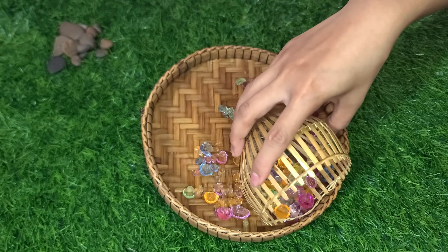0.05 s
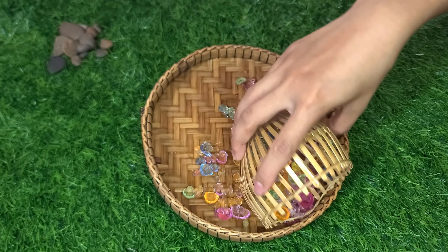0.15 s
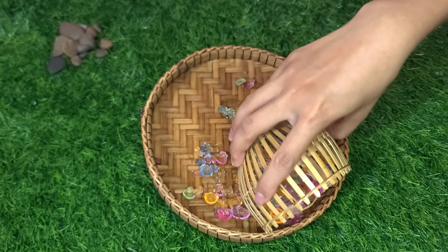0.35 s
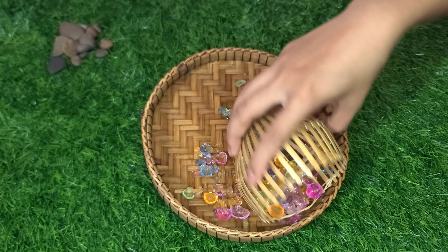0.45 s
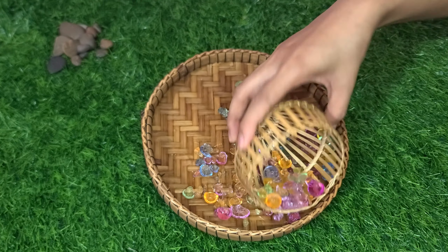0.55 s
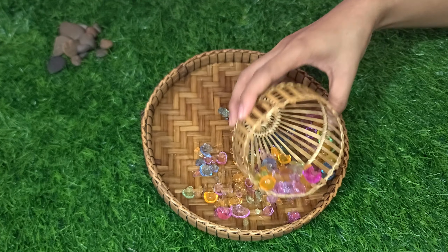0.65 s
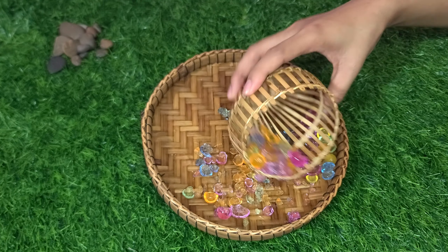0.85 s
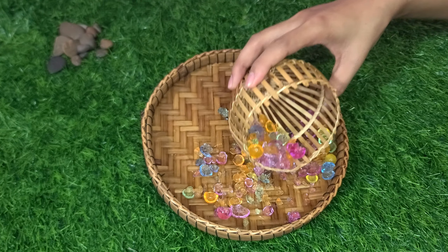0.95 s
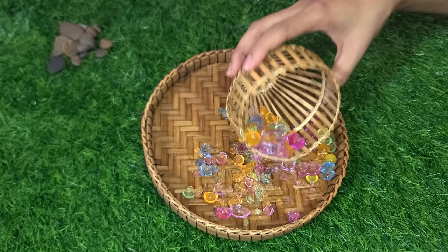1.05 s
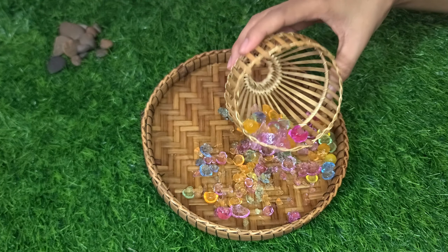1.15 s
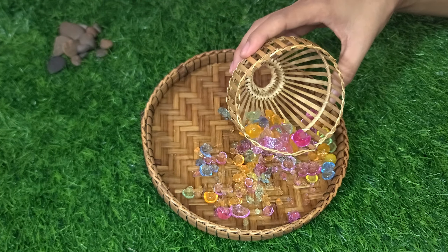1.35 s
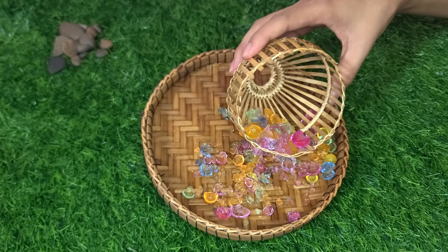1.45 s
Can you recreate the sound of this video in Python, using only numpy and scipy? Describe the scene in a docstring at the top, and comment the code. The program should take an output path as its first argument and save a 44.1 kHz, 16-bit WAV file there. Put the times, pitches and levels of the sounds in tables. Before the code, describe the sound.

A small bamboo basket rustles and ticks lightly on a woven tray, then slips with one sharp snap and a soft hollow thud at about 0.2 seconds. A piece taps the tray near 0.3 seconds. Faint sticky gel pops follow from 0.4 to 0.55, and the ticks die away by 0.7. It is heard close up in a small room, with low hum and faint hiss until 1.5 seconds.

```python
"""A small bamboo basket is pressed into gel pieces on a woven tray and lifted away, close up.
Its ribs rustle and tick over the weave, then catch and slip with one sharp snap.
The gel squishes in tiny sticky pops; the hollow tray rings under knocks and dropping pieces,
swells softly when rubbed and thuds at the snap. A small room answers, over low hum and faint hiss."""
import sys
import numpy as np
from scipy import signal
from scipy.fft import rfft, irfft, next_fast_len
from scipy.io import wavfile
from scipy.ndimage import map_coordinates

SR = 44100
rng = np.random.default_rng(int(sys.argv[2]) if len(sys.argv) > 2 else 0)


def dump_mix(stems):
    """Bounce the given channels to the path in sys.argv[1] as a 16-bit WAV at rate SR."""
    frames = np.atleast_2d(stems).T  # one column per channel
    limited = np.clip(frames, -1, 1)  # hard clip at full scale
    pcm = np.round(limited * 32767).astype(np.int16)
    wavfile.write(sys.argv[1], SR, pcm)


N = 66150
T = np.arange(N) / SR

# The quick slips that make up the snap. Each row: start in seconds, level in dB, left-side lag in ms.
SLIPS = [(0.2224, -13.5, .055), (.22354, -12.5, .05), (0.225, -24.5, .08)]
# The ring of a bamboo rib. Each row: pitch in Hz, level in dB, 60 dB decay time in seconds.
RIB_MODES = [(1201, -11, 0.01423), (1952, -18, 0.01162), (2610, -19, 0.011), (3298, -9.5, 0.0077),
             (4037, -6.3, 0.0067), (4860, -4, .006), (5430, -7.5, .007), (6474, -9, .007),
             (8660, -14.5, 0.00827)]
# The bright tone of the crack. Each row: frequency in Hz, level in dB.
CRACK_EQ = [(800, -7), (2250, -13), (4200, 1), (5800, 0.5), (7000, .5), (8200, -5.5), (9500, -3.5),
            (16000, -7)]
# Where the snap sits in stereo. Each row: frequency in Hz, left minus right in dB.
SNAP_PAN = [(1000, -3.5), (4500, 2), (9000, -5), (15000, -5)]
# Ticks of the weave. Each row: start in seconds, level in dB, brightness in dB per octave.
TICKS = [(0.026, -60, 3), (.04, -42.5, 8), (.051, -55, 0), (0.061, -48, 3), (0.1064, -63.5, -1),
         (0.1192, -55.5, -0.5), (0.1615, -58.5, -4), (.185, -44.5, -3.5), (0.201, -45.5, 8),
         (0.2183, -37.5, -2), (0.3195, -42, -3), (0.3286, -45.5, -2.5), (0.413, -55.5, -0.5),
         (0.4315, -51.5, -1.5), (0.441, -59, -1), (0.46, -56.5, -11.5), (0.561, -54.5, 1),
         (.583, -61.5, 3.5), (0.647, -63, 7)]
# The tone of a tick. Each row: frequency in Hz, level in dB.
TICK_EQ = [(300, -18.5), (1200, 1.5), (2300, -3.5), (3600, 2), (5500, -2.5), (7500, 3), (10000, -3),
           (16000, -3)]
# Rubbing strokes. Each row: start and end in seconds, level in dB, brightness in dB per octave.
STROKES = [(.002, 0.036, -64, 1), (0.023, 0.059, -59, 0), (0.06, 0.136, -70, 2.5),
           (0.143, 0.179, -60, -1.5), (0.181, 0.249, -49, 0), (0.344, 0.48, -70, 1.5),
           (0.458, 0.49, -61.5, -1.5), (0.486, 0.542, -64, 0.5), (0.551, 0.632, -74.5, 1.5)]
# The tone of the rubbing. Each row: frequency in Hz, level in dB.
RUB_EQ = [(150, -3.5), (560, -7.5), (800, -3), (1600, 2.5), (2300, -7.5), (3300, 0), (5000, -7.5),
          (8000, -14.5), (16000, -15.5)]
# Gel squeezed under the rim. Each row: start and end in seconds, typical pitch in Hz, level in dB.
SQUISHES = [(0.038, 0.071, 1200, -65), (.022, 0.042, 3300, -65), (.43, .438, 1350, -56.5),
            (.459, .471, 1930, -63.5), (.484, .512, 1530, -60), (.51, .541, 1714, -61.5),
            (.481, 0.499, 5200, -67), (.486, .53, 3270, -63.5), (.515, 0.539, 2700, -62)]
# Knocks on the tray. Each row: start in seconds, level in dB.
KNOCKS = [(.026, -47.5), (.034, -54.5), (.186, -41.5), (.193, -45.5), (.2, -39.5), (.2108, -39.5),
          (.2228, -32), (.2268, -42.5), (.461, -53.5)]
# The ring of the tray. Each row: pitch in Hz, level in dB, 60 dB decay time in seconds.
TRAY_MODES = [(688, -13, 0.032), (814, -10.5, .06), (943, -16, .17), (1023.6, -12.5, 0.17),
              (1171.4, -9.5, 0.087), (1240.3, -12, 0.053), (1366.6, -11, 0.1719), (1476, -10, .075),
              (1818, -11.5, .055), (1960, -12.5, 0.04)]
# The dull puff of a blow. Each row: frequency in Hz, level in dB.
PUFF_EQ = [(800, 8.5), (1900, 3), (2500, -15), (8000, -24.5), (16000, -33)]
# Pieces dropping on the tray. Each row: start in seconds, level in dB.
DROPS = [(.3292, -35), (.3384, -55)]
# The thinner tone of those drops. Each row: frequency in Hz, gain in dB.
DROP_EQ = [(200, -24), (820, -26), (950, -4.5), (1150, 1.5), (1400, -2.5), (1950, 4), (2500, -10.5),
           (8000, -5.5)]
# The tray swells as the basket shifts. Each row: peak time and width in seconds, level in dB.
SWELLS = [(0.042, 0.013, -63), (0.186, .03, -69), (0.514, 0.021, -71.5), (0.982, 0.05, -72)]
# The tray's low body. Each row: pitch in Hz, level in dB, 60 dB decay time in seconds.
BODY_MODES = [(245, 0.5, .25), (328, -5, 0.29), (413, -9, 0.12)]
# How far the left microphone leads the right. Each row: frequency in Hz, phase in radians.
MIC_PHASE = [(300, 0), (700, 0.012), (1100, 1), (1800, 0.69), (2600, -0.41), (5000, -0.46), (9000, -0.22)]
# The length of the room's tail. Each row: frequency in Hz, 60 dB decay time in seconds.
ROOM_DECAY = [(200, 0.59), (1000, 0.25), (4000, 0.28), (9000, .29), (16000, 0.17)]
# The tone of the tail. Each row: frequency in Hz, gain in dB.
ROOM_EQ = [(150, -3.5), (550, -11), (1200, -10.5), (2400, -3.5), (4500, -7), (8000, -7), (15000, -4.5)]
# The tail's stereo image. Each row: frequency in Hz, left-right likeness (1 is mono).
ROOM_LIKENESS = [(200, 0.76), (650, 0.42), (1200, 0.96), (3000, 0.46), (10000, 0)]
# The rise and fall of the hum. Each row: time in seconds, level in dB.
HUM_LEVELS = [(0, -78.5), (.044, -50.5), (.08, -58.5), (.115, -96), (.165, -60.5), (.3, -57), (.39, -57),
              (.44, -54.5), (.6, -54), (.75, -58), (1.0, -60), (1.11, -57.5), (1.15, -68.5), (1.37, -70),
              (1.42, -62), (1.5, -66.5)]
# The tone of the room rumble. Each row: frequency in Hz, level in dB.
RUMBLE_EQ = [(20, -7.5), (40, -13), (60, 7), (80, -2.5), (102, 3), (135, -14.5), (180, -21.5), (250, -12),
             (290, -24), (340, -14.5), (550, -23.5), (900, -42.5), (2000, -77)]
# The tone of the hiss. Each row: frequency in Hz, level in dB.
HISS_EQ = [(100, -6.5), (500, 2), (1000, -0.5), (2000, -4.5), (3200, -6.5), (5500, -16), (7000, -28.5),
           (8800, -26.5), (10200, -16), (15500, -19)]


def rib_slip(start, db, lag_ms, crack_db=-6.5):
    """One jerk of a rib slipping off the weave: a crack and a very short ring."""
    crack = spread(coloured(burst(start, t60=0.012), CRACK_EQ), [(1000, 1.0), (10000, 0.35)])
    jerk = amp(db) * low_cut(ring(RIB_MODES, start, scatter_db=1.5) + amp(crack_db) * crack, order=8)
    delay = lambda hz: np.exp(np.outer([-1j, 1j], np.pi * hz * lag_ms / 1000))
    pan = lambda hz: amp(np.outer([.5, -.5], along(SNAP_PAN, hz)))
    return filtered(jerk, lambda hz: delay(hz) * pan(hz))


def weave_ticks():
    """Single strips of bamboo flick past each other."""
    pair = sum(amp(db) * coloured(burst(start, t60=0.019, attack=0.00046), TICK_EQ, tilt)
               for start, db, tilt in TICKS)
    return spread(pair, [(1000, 0.76), (4000, 0.9), (8000, 0.044)])


def rim_rustle(catches_per_s=1800, scatter_db=4.5, smooth_mix=0.85, attack_s=0.0041, release_s=.014):
    """The rim rubs over weave and gel: dense tiny catches blended with smooth noise."""
    out = np.zeros((2, N))
    for start, end, db, tilt in STROKES:
        catches = (rng.random((2, N)) < catches_per_s / SR) * rng.choice([-1, 1], (2, N))
        catches = catches * amp(scatter_db * rng.standard_normal((2, N)))
        grit = unit(unit(catches) + smooth_mix * rng.standard_normal((2, N)))
        stroke = np.clip((T - start) / attack_s, 0, 1) * np.exp(-np.maximum(T - end, 0) / release_s)
        out += amp(db) * coloured(stroke * grit, RUB_EQ, tilt)
    return spread(out, [(1000, 1.0), (4000, 0.36), (7000, .05)])


def gel_squish(pops_per_s=500, decay_cycles=20, scatter_octaves=.085, scatter_db=3):
    """Sticky gel lets go in a crowd of tiny damped pops, each at its own pitch."""
    out = np.zeros(N)
    t = np.arange(SR // 50) / SR
    for start, end, pitch_hz, db in SQUISHES:
        draw = rng.standard_normal((200, 2))
        onsets = (np.arange(len(draw)) + rng.random(len(draw))) / pops_per_s
        hz = pitch_hz * 2 ** (scatter_octaves * draw[:, :1])
        strength = amp(scatter_db * draw[:, 1:]) * (onsets < end - start)[:, None]
        envelope = (1 - np.exp(-t * hz)) * amp(-60 * t * hz / decay_cycles)
        pops = strength * envelope * np.sin(2 * np.pi * hz * t)
        samples = np.round((start + onsets[:, None] + t) * SR).astype(int)
        crowd = np.bincount(samples.ravel(), pops.ravel(), N)[:N]
        out += amp(db) * unit(crowd) * np.sqrt((end - start) * SR / N)
    return out


def tray_knocks(blows, puff_db=2):
    """Each blow gives a dull puff and rings the hollow tray."""
    puffs = sum(amp(db) * burst(start, t60=0.011) for start, db in blows)
    rings = sum(amp(db) * ring(TRAY_MODES, start, scatter_db=3.5) for start, db in blows)
    return low_cut(rings + amp(puff_db) * spread(coloured(puffs, PUFF_EQ), [(1000, 0.24)]))


def tray_body(thud_db=-50.5, waver_rad=0.2):
    """The tray's low modes swell softly when rubbed, and thud at the snap."""
    swells = sum(amp(db) * np.exp(-.5 * ((T - peak) / width) ** 2) for peak, width, db in SWELLS)
    drone = sum(amp(db + 3.9 * wobble(30)) * np.sin(2 * np.pi * hz * T + waver_rad * wobble(30))
                for hz, db, _ in BODY_MODES)
    thud = amp(thud_db) * ring(BODY_MODES, SLIPS[0][0], scatter_db=1.5)
    return swells * unit(drone) + thud


def room(x, send_db=-2, onset_s=0.0047):
    """The small room's tail, lingering longest in the bass."""
    hz, t, spectrum = signal.stft(rng.standard_normal((2, N)), SR, nperseg=256)
    decay = amp(-60 * t / along(ROOM_DECAY, hz)[:, None])
    tail = signal.istft(spectrum * decay, SR, nperseg=256)[1][:, :N]
    tail *= np.clip(T / onset_s - .5, 0, 1)
    tail = eq(spread(tail / np.linalg.norm(tail[0]), ROOM_LIKENESS), ROOM_EQ)
    return amp(send_db) * signal.fftconvolve(x, tail, axes=1)[:, :N]


def background(hum_hz=93.66, rumble_db=-62, hiss_db=-72.5, follow=0.13):
    """A wavering low hum over room rumble and hiss."""
    level_db = np.interp(T, *np.transpose(HUM_LEVELS))
    hum_gain = np.sqrt(2) * amp(level_db + 0.42 * wobble(27))
    hum = hum_gain * np.sin(2 * np.pi * hum_hz * T + 0.099 * wobble(8.8))
    rumble = amp(rumble_db) * noise_bed(RUMBLE_EQ, [(60, 0.78), (400, 0.77)])
    # The deep end of the rumble rides a share of the hum's level swings.
    deep = filtered(rumble, lambda hz: hz < 2 * hum_hz)
    rumble += deep * (amp(follow * (level_db - level_db.mean())) - 1)
    hiss = amp(hiss_db) * noise_bed(HISS_EQ, [(300, .5), (900, -0.26), (10000, 0.0047)])
    return (hum + rumble) * amp([[-.8], [.8]]) + hiss


def amp(db):
    """Decibels to gain."""
    return 10 ** (np.asarray(db) / 20)


def unit(x):
    """Scaled to rms 1."""
    return x / np.sqrt(np.mean(x ** 2) + 1e-20)


def along(points, hz):
    """A curve through (Hz, value) points on a log axis."""
    freqs, values = np.transpose(points)
    return np.interp(np.log(hz + 1), np.log(freqs + 1), values)


def filtered(x, response):
    """x shaped by a frequency response."""
    size = next_fast_len(N + SR // 2)
    return irfft(rfft(x, size) * response(np.fft.rfftfreq(size, 1 / SR)), size)[..., :N]


def eq(x, points):
    """A zero-phase equaliser through (Hz, dB) points."""
    return filtered(x, lambda hz: amp(along(points, hz)))


def coloured(x, points, tilt_db=0, size=2048):
    """A causal equaliser of unit energy, tilted per octave above 500 Hz."""
    hz = np.fft.rfftfreq(size, 1 / SR)
    cepstrum = irfft(np.log(amp(along(points, hz) + tilt_db * np.log2(np.maximum(hz, 500)))))
    # Minimum phase keeps the attacks crisp.
    cepstrum[1:size // 2] *= 2
    cepstrum[size // 2 + 1:] = 0
    impulse = irfft(np.exp(rfft(cepstrum)))
    return filtered(x, lambda _: rfft(impulse / np.linalg.norm(impulse), next_fast_len(N + SR // 2)))


def low_cut(x, order=6, cutoff_hz=740):
    """A high-pass: little bass is left below the cut-off."""
    return signal.sosfilt(signal.butter(order, cutoff_hz, "high", fs=SR, output="sos"), x)


def spread(pair, likeness):
    """Two unrelated signals mixed to stereo by (Hz, left-right likeness) points."""
    angle = lambda hz: np.arccos(np.clip(along(likeness, hz), -1, 1)) / 2
    mid, side = filtered(pair, lambda hz: np.array([np.cos(angle(hz)), np.sin(angle(hz))]))
    return np.array([mid + side, mid - side])


def fade(start, t60):
    """A sudden start, then 60 dB of decay every t60 seconds."""
    return (T >= start) * amp(-60 * np.maximum(T - start, 0) / t60)


def burst(start, t60, attack=1e-5):
    """Two unrelated puffs of noise of equal energy."""
    envelope = fade(start, t60) * np.clip((T - start) / attack, 0, 1)
    puffs = envelope * rng.standard_normal((2, N))
    return puffs * np.linalg.norm(envelope) / np.linalg.norm(puffs, axis=1, keepdims=True)


def ring(modes, start, scatter_db):
    """Damped modes struck together, each a little different in strength."""
    return sum((-1) ** k * amp(db + scatter_db * rng.standard_normal())
               * fade(start, t60) * np.sin(2 * np.pi * hz * (T - start))
               for k, (hz, db, t60) in enumerate(modes))


def wobble(rate):
    """A smooth random curve, rate knots a second."""
    return map_coordinates(rng.standard_normal(256), [T * rate + 2], mode="wrap")


def noise_bed(points, likeness):
    """Steady, equalised stereo noise at rms 1."""
    return unit(spread(eq(rng.standard_normal((2, N)), points), likeness))


def scene():
    """Basket, gel and tray in the room, heard by two close microphones."""
    drops = eq(tray_knocks(DROPS), DROP_EQ)
    textures = (weave_ticks() + rim_rustle() + gel_squish()) * amp([[-.5], [.5]])
    handling = textures + drops + tray_knocks(KNOCKS)
    snap = [rib_slip(*row) for row in SLIPS]
    mic_phase = lambda hz: np.exp(np.outer([.5j, -.5j], along(MIC_PHASE, hz)))
    direct = filtered(sum(snap) + handling, mic_phase)
    reverb = sum(room(jerk) for jerk in snap) + room(handling)
    return direct + reverb + tray_body() + background()


def record(dry):
    """A hard cut takes off the top at 16 kHz."""
    return filtered(dry, lambda hz: hz < 16000)


dry = scene()
out = record(dry)
dump_mix(out)
```